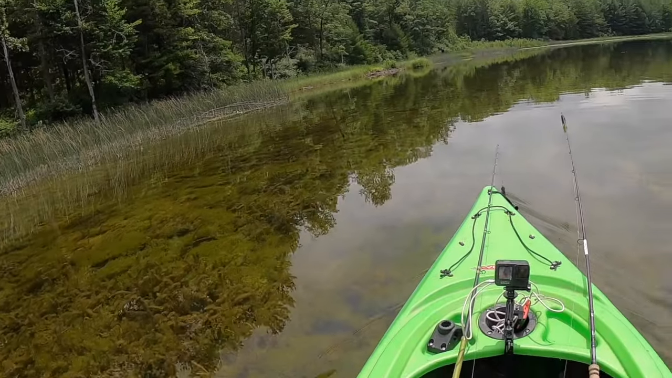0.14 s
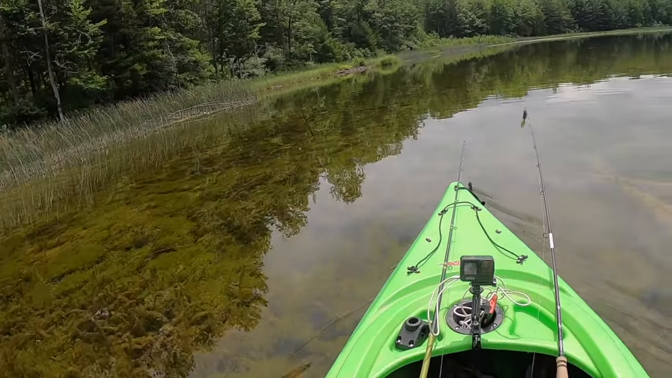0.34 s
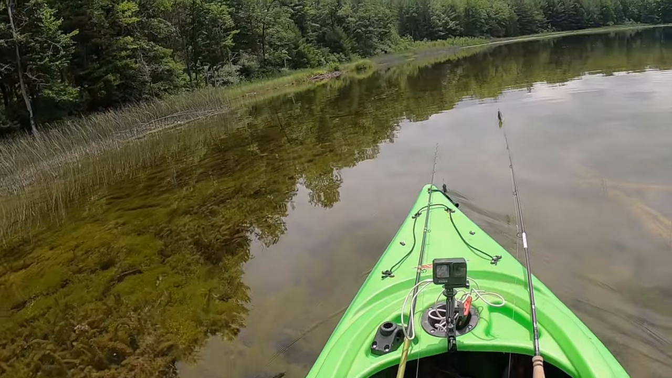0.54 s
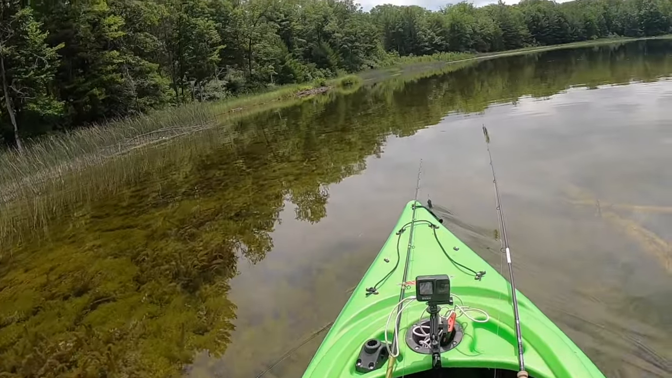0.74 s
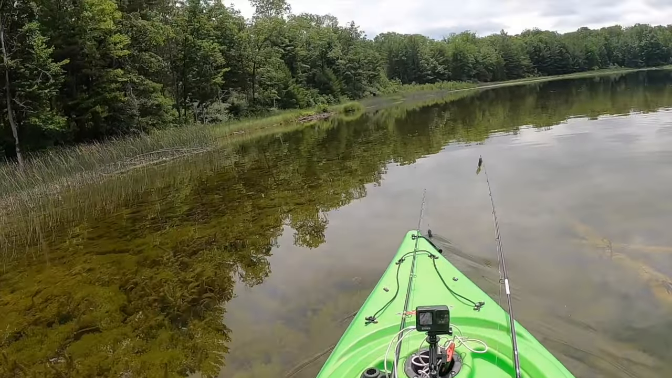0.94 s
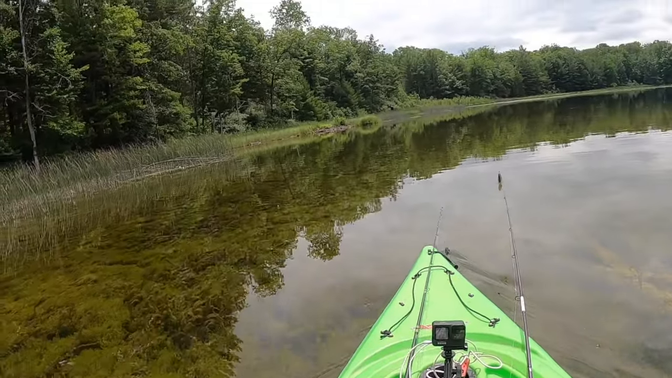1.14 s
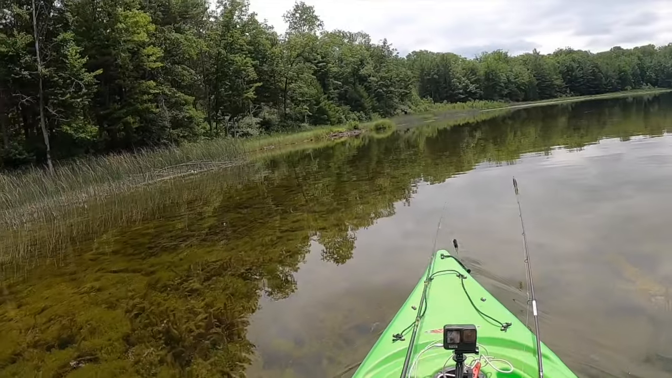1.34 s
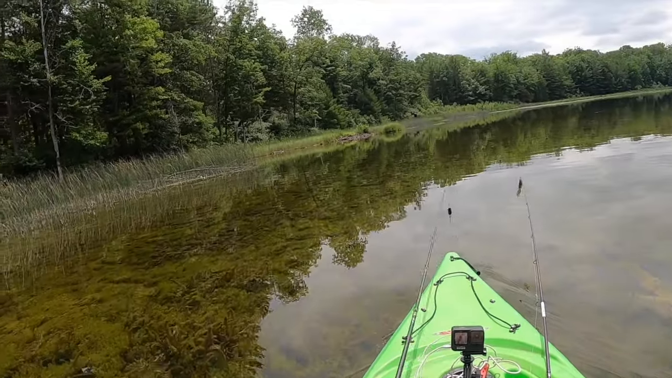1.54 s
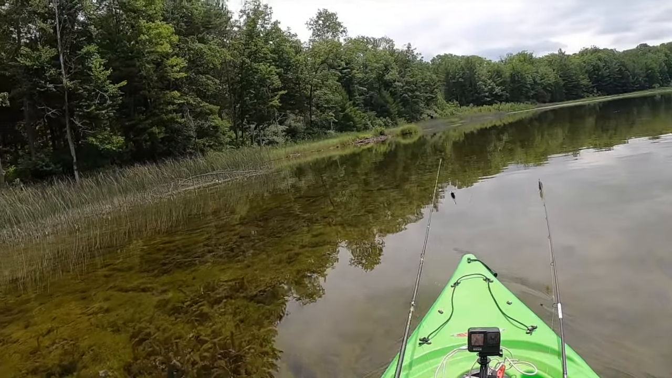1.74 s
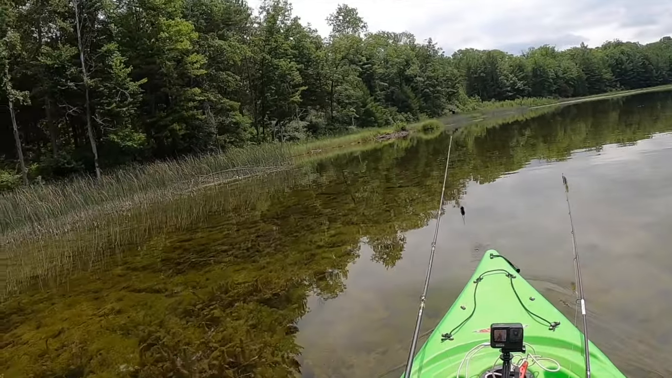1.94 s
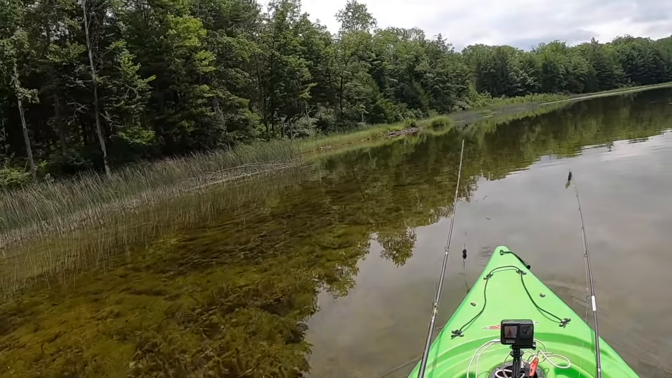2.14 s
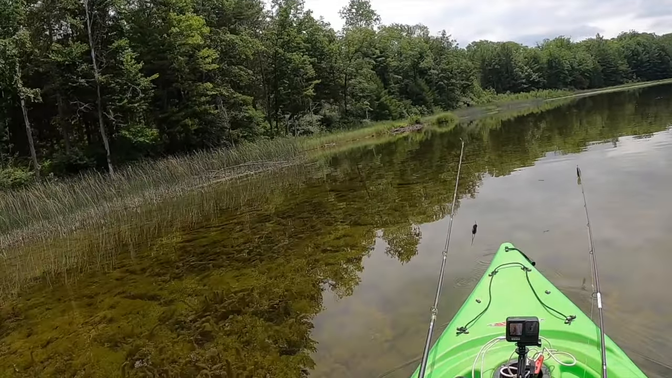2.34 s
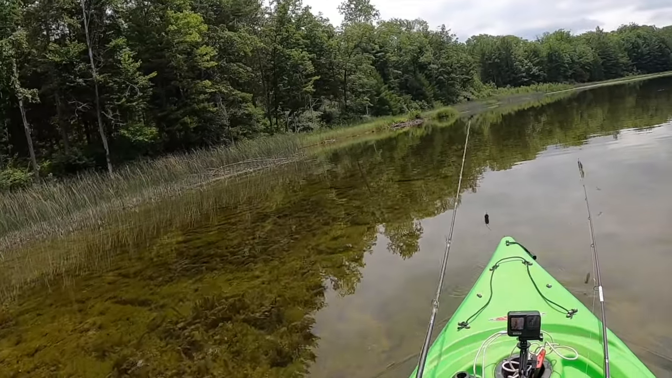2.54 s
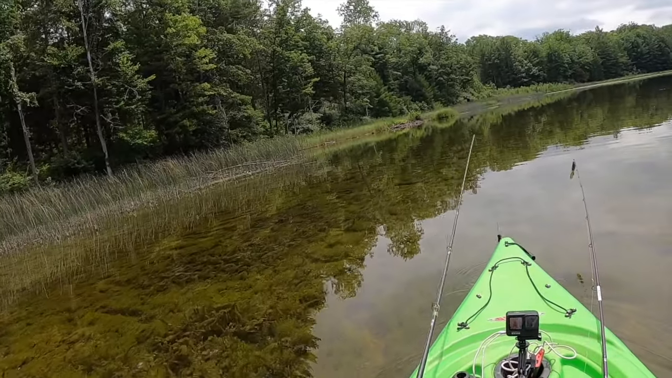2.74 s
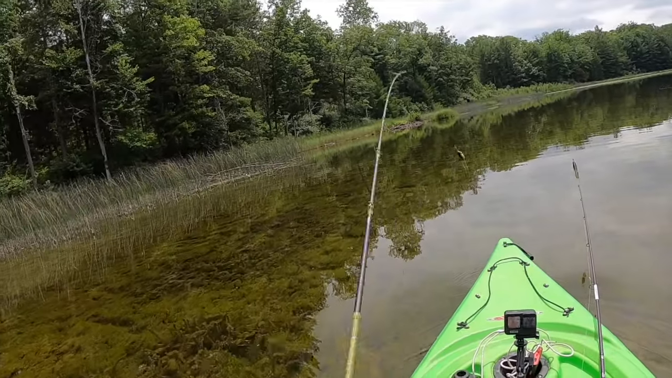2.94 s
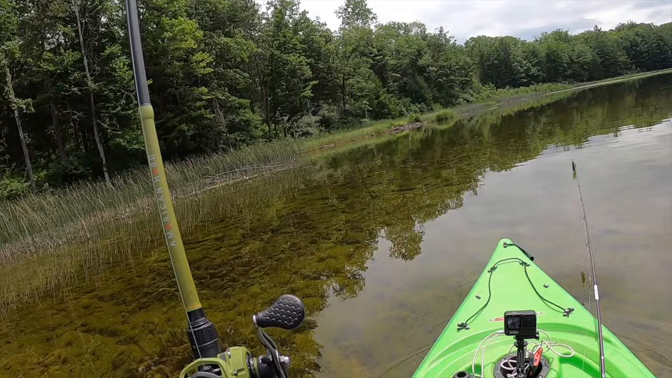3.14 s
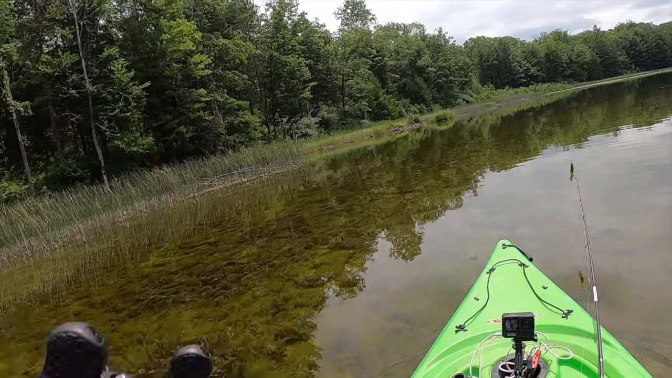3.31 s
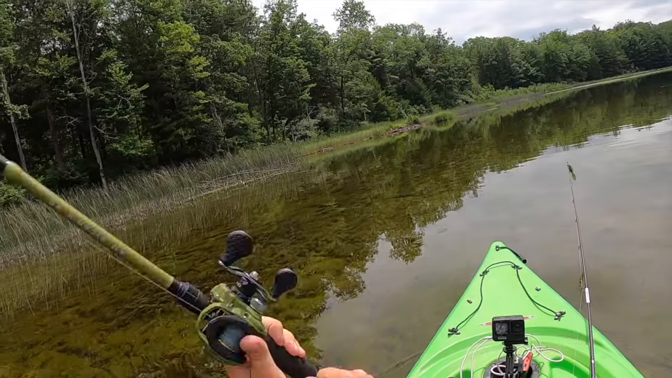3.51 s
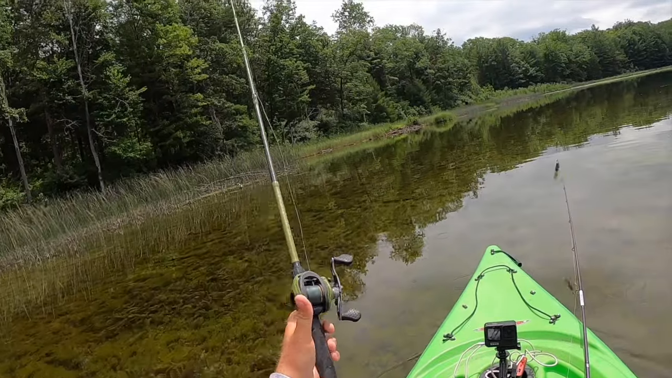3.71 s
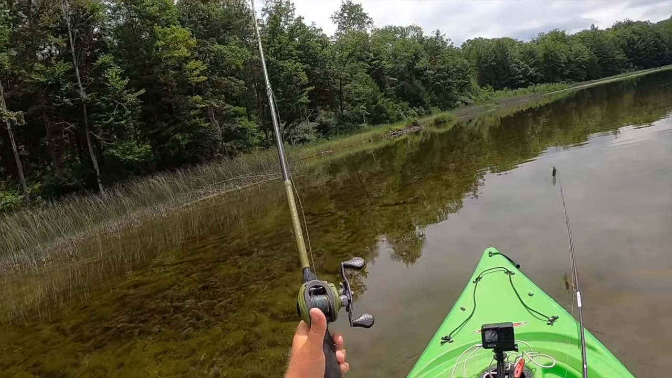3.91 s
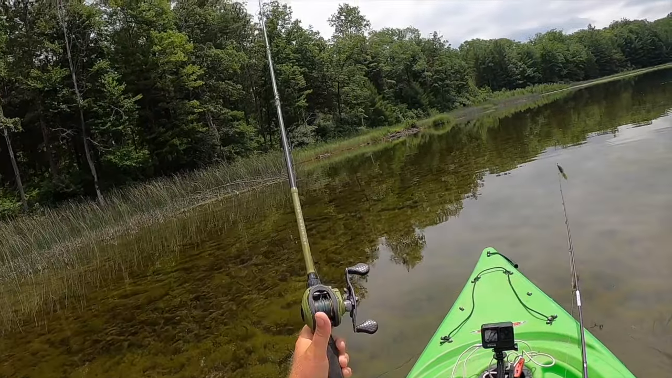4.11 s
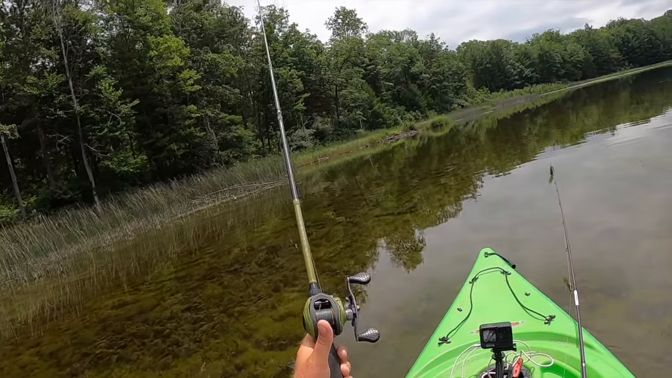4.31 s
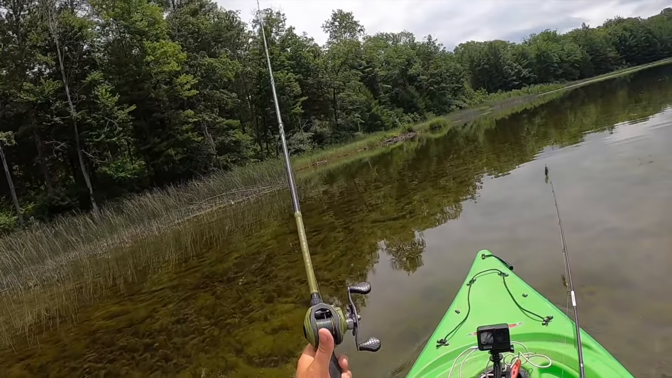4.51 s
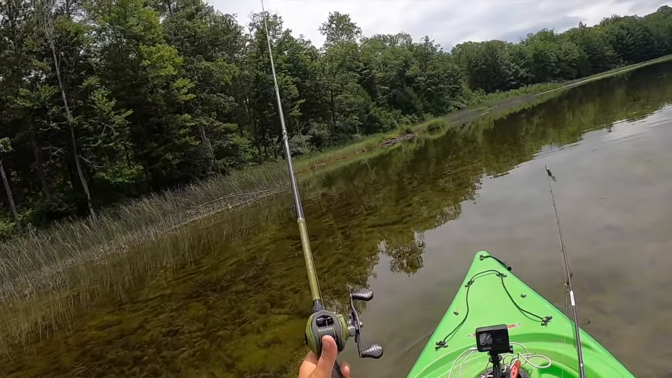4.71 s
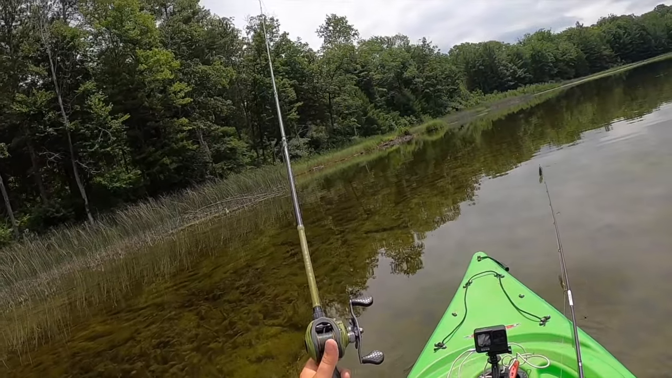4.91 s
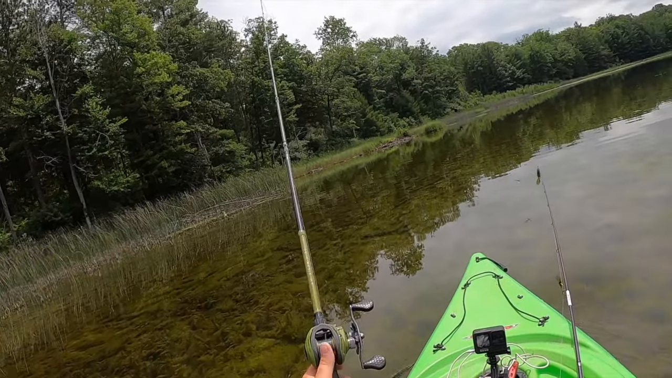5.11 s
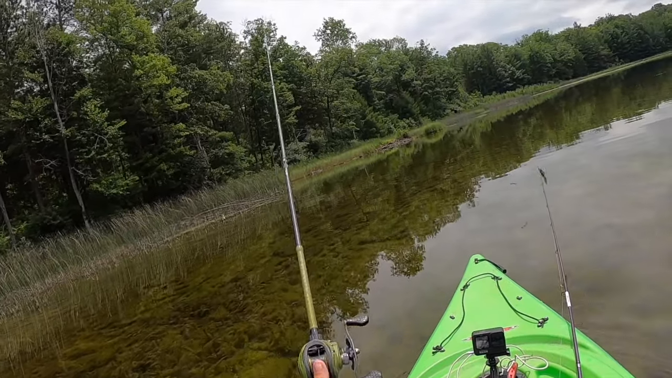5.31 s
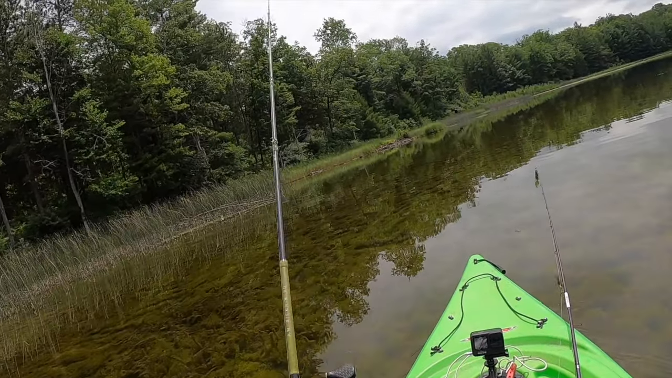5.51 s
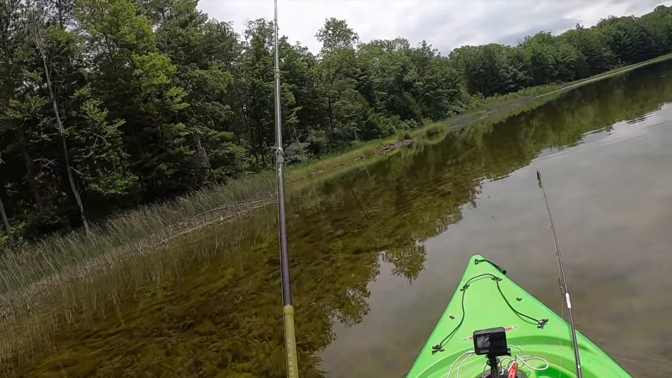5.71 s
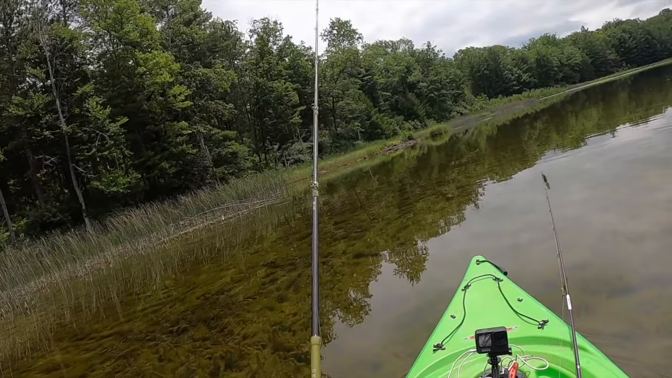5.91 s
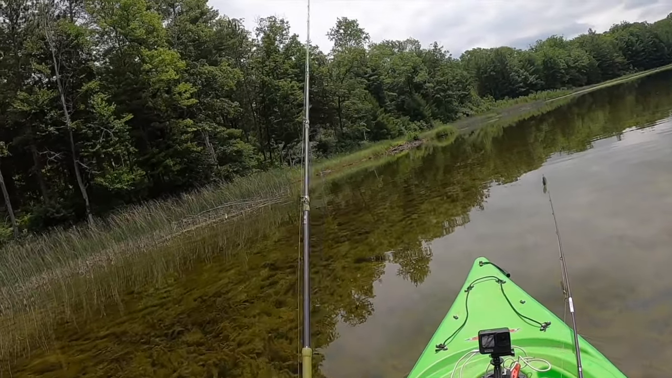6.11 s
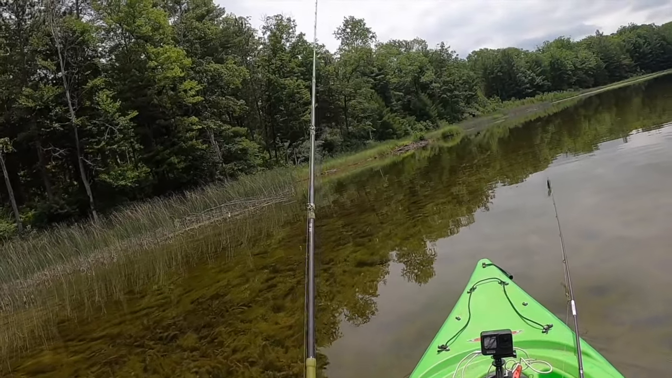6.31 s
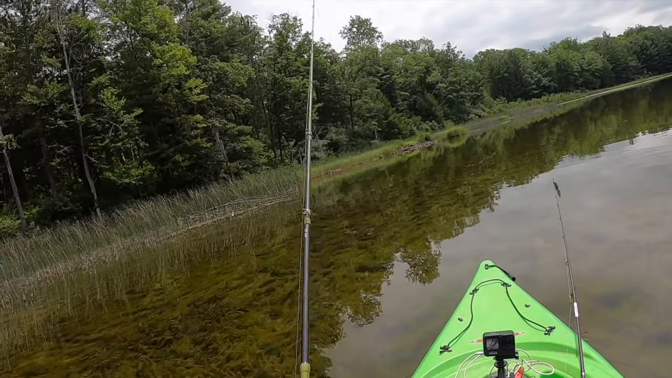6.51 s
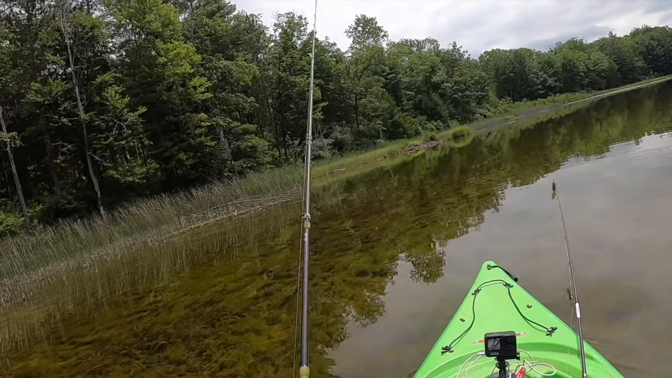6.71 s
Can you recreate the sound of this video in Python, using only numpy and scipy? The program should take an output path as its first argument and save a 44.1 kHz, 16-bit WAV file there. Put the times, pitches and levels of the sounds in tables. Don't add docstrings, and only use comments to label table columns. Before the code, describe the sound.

An angler handles gear in a plastic kayak: shuffling and dull thuds, sparse bright clicks, one very sharp snap. After a short lull, knocks bunch together and the cast zips out, the reel whirring and humming lower as line ticks through the guides. It stops, a reel click cluster follows, and soft rubbing continues. Distant birds chirp, a fly passes, and a low faint rumble lies beneath the close outdoor stereo sound.

```python
import sys
import numpy as np
from scipy import signal
from scipy.io import wavfile
from scipy.ndimage import uniform_filter1d

SR = 44100
rng = np.random.default_rng(int(sys.argv[2]) if len(sys.argv) > 2 else 0)


def unload_audio(sound):
    columns = np.transpose(np.atleast_2d(sound))
    steps = np.round(np.clip(columns, -1, 1) * 32767)
    wavfile.write(sys.argv[1], SR, steps.astype(np.int16))


def invert_db(level):
    return 10 ** (np.asarray(level, dtype=float) / 20)


N = 297675

# time_s, hull_sway_db
RUMBLE_S_DB = [(0.0, -59), (0.28, -61), (2.3, -63), (2.5, -69), (3.27, -69), (3.6, -64), (3.76, -54),
               (3.93, -70), (4.57, -74), (5.77, -61), (5.92, -74), (6.75, -69)]
# freq_hz, level_db
DEEP_HZ_DB = [(15, -18), (30, -11), (45, -4.5), (60, -17.5), (77, 3), (95, -9), (115, -11), (140, -54)]
UPPER_HZ_DB = [(90, -13), (120, -6.5), (152, 4), (200, -2), (300, -9.5), (420, -18), (600, -45)]
AIR_HZ_DB = [(165, -4), (500, -16), (1250, -11), (1900, -18), (2750, -8), (4030, -24.5), (7500, -22),
             (9000, -34)]
FIZZ_HZ_DB = [(8800, -6), (9500, 0), (10800, -7), (12500, -2), (13600, -8), (14500, -30)]
AIR_DB, FIZZ_DB = -70, -98.5
UPPER_DB, UPPER_FOLLOWS = -63.5, .35
# freq_hz, correlation_ratio
SAME_HZ_RATIO = [(60, .92), (180, 0.59), (550, 0.49), (1650, 0.7), (4970, 0.29), (15000, 0.5)]
# freq_hz, left_minus_right_db
LEAN_HZ_DB = [(60, 2), (180, -1.5), (550, -3.5), (1650, 2.5), (4970, 3.5), (15000, -7.5)]

# freq_hz, level_db
RUB_HZ_DB = [(150, -27), (300, -4), (600, -1), (850, -6), (1150, 6.5), (1500, -1.5), (2000, -24.5),
             (3000, -44)]
REEL_HZ_DB = [(1200, -28), (1800, -4), (2200, 1.5), (2800, 2.5), (3500, -4), (4300, -9.5), (6000, -20)]
CLOTH_HZ_DB = [(2500, -3), (3800, -5.5), (5000, -0.5), (6000, -1), (7400, -4.5), (7900, -4), (8600, -17)]
HISS_HZ_DB = [(7000, -30), (8300, 1.5), (9000, 1.5), (10000, -5), (12000, -10), (14000, -18), (15600, -30)]
STIRS_DB = {"hull": (0, -14, -28, -42), "reel": (-12, 0, -19, -40), "whir": (-30, -16, -9, 0),
            "sleeve": (-8, -4, 0, -10.5), "rod": (-3, 1, 2, -9), "line": (-11, -2.5, -6, -11),
            "rest": (-82, -82, -90, -95)}
MOVES = {"hull": [(.02, -54, .1, .13), (.48, -53, .35, .3), (.5, -54, .2, .04), (.668, -52, .02, .13),
         (1.1, -67, .5, 3.0), (2.3, -58, .03, .12), (3.22, -62, .08, .25), (3.62, -59, .6, .3),
         (3.82, -54, .1, .45), (5.7, -59, .4, .4), (6.3, -69, 1.1, 2.2)], "reel": [(.022, -49, .1, .07),
         (.335, -45, .06, .04), (.25, -55, .04, .03), (.72, -65, .4, 1.8), (3.6, -60, .3, .1),
         (3.775, -46, .04, .1), (1.2, -68, .15, .3), (1.66, -61, .1, .2), (2.245, -61, .12, .1),
         (2.56, -67, .08, .2), (2.65, -68, .1, .1), (3.12, -66, .3, .3), (5.4, -60.5, .4, 1.6),
         (6.4, -64, 1.5, 2.2)], "sleeve": [(1.73, -62, .03, .24), (2.32, -63, .04, .45),
         (2.985, -75, .03, .15), (3.25, -65, .1, .1), (3.3, -69, .12, 1.1), (3.645, -57, .08, .04),
         (5.5, -71, .1, .15), (5.85, -68, .1, .6), (6.15, -70, .15, .3), (6.38, -70, .15, 1.5)],
         "rod": [(3.728, -41.5, .07, .15), (3.785, -45, .06, .07)], "whir": [(3.785, -52, .09, .06),
         (3.9, -58, .1, 1.25), (4.42, -66, .05, .1), (4.51, -67, .06, .15), (4.72, -69, .08, .12),
         (4.84, -67, .06, .08), (5.02, -74, .15, .4), (5.31, -63, .04, .05)]}
LINE_OUT_S, THUMB_S, LINE_DB, LINE_FADE_DB_PER_S = 3.8, 5.335, -55, 8.5

# start_s, peak_db, ring_hz, bright_db
TICKS = [(0.012, -42, 3000, -34), (0.2129, -52, 2200, -30), (0.2229, -48, 2900, -26),
         (0.244, -50, 2600, -30), (0.2515, -42, 2460, -32), (0.258, -47, 2700, -32),
         (0.2848, -47, 2900, -32), (0.3027, -46, 2200, -34), (0.3162, -45, 2100, -35),
         (0.3301, -38, 2030, -38), (0.5766, -47, 2400, -26), (2.9333, -46, 2200, -40),
         (3.526, -48, 2400, -30), (3.175, -52, 1750, -35), (3.204, -52, 1700, -35), (2.916, -54, 1700, -35),
         (3.765, -34, 2800, -20), (3.771, -34, 2400, -20), (3.867, -40, 2700, -15),
         (1.3648, -53, 2980, -15), (1.713, -27, 6300, -18), (1.7128, -36, 1600, -30),
         (2.0448, -49.5, 2520, -12.5), (2.1753, -49.5, 2550, -9.5), (2.2144, -47, 2436, -4),
         (2.3364, -36, 2350, -26), (2.3998, -46.5, 2130, -17), (2.4367, -48.5, 3800, -29),
         (5.6194, -38, 1900, -34), (5.622, -42, 2800, -34), (5.7175, -33.5, 2140, -35),
         (6.3228, -37.5, 2840, -24), (6.354, -49, 3420, -14)]
# start_s, peak_db, ring_hz
KNOCKS = [(0.026, -41, 1440), (0.06, -48, 700), (0.12, -53, 800), (0.198, -51, 192), (3.718, -31, 780),
          (0.672, -44, 900), (0.704, -44, 1200), (0.486, -48, 1230), (0.512, -46, 1080), (0.69, -46, 300),
          (3.474, -44, 1500), (3.481, -43, 130), (3.556, -47, 1900), (3.637, -38, 400), (3.612, -44, 487),
          (3.698, -42, 900), (3.713, -32, 600), (3.738, -36, 1200), (3.68, -44, 280), (0.529, -38, 630),
          (0.547, -43, 600), (0.537, -40, 610), (0.663, -44, 1080), (0.684, -37.5, 1320),
          (2.322, -52, 1160), (2.825, -54, 1100), (3.475, -40, 350), (3.513, -50, 217), (3.549, -42, 1314),
          (3.632, -33, 454), (3.721, -26, 540), (3.726, -34, 1050), (3.809, -45, 272), (4.686, -48, 1550),
          (4.703, -46, 1345), (5.448, -50.5, 1170), (5.542, -42, 1020), (5.572, -40, 323),
          (5.592, -45, 217), (5.882, -44, 300)]
# start_s, peak_db, ring_hz
SLAPS = [(3.8531, -42, 3560), (3.859, -44, 5000), (3.925, -45, 5200), (3.9394, -43, 3700),
         (4.417, -47, 8800), (4.1163, -42, 5500), (4.1575, -43, 3760), (4.2376, -44, 3630),
         (4.3052, -46, 5340), (4.363, -41, 6250), (5.3082, -50, 3560), (5.328, -54, 2200)]

# level_db, path [time_s, pitch_hz], beat_hz, depth_hz
TRILLS = [
    (-70.5, [(.497, 8000), (.575, 7850)], 40, 700),
    (-70, [(.58, 7750), (.76, 7500)], 29, 800),
    (-73.5, [(.82, 7300), (.97, 7570)], 37, 390),
    (-75.5, [(1.37, 7480), (1.63, 7460)], 31, 2000),
]
# start_s, length_s, level_db, from_hz, to_hz
SLURS = [(.785, .13, -68.5, 3200, 2130), (1.79, .06, -71, 2250, 2500), (2.75, .05, -70, 1950, 2480),
         (3.074, .095, -67, 3950, 2150), (5.42, .075, -63, 3950, 3450), (5.69, .09, -61.5, 2100, 2600),
         (5.92, .14, -68.5, 3600, 3400), (5.97, .21, -69.5, 3050, 2700), (6.19, .14, -62.5, 3400, 2130),
         (1.24, .065, -68, 2600, 3000), (1.95, .03, -68, 2600, 3450), (2.06, .035, -68, 2600, 2900),
         (6.665, .08, -75, 7000, 7600)]
# start_s, length_s, level_db, from_hz, to_hz
GLIDES = [(.74, .035, -67, 2800, 3300), (1.385, .025, -67, 2900, 3040), (1.45, .075, -61.5, 2630, 2700),
          (1.595, .075, -61.5, 2500, 2450), (1.46, .17, -67, 2950, 2900), (.95, .07, -70, 2200, 2130),
          (1.018, .03, -67, 2980, 2800), (1.03, .06, -71, 2500, 2430), (5.2, .08, -71, 3420, 3400),
          (5.505, .095, -68, 3430, 3480), (5.535, .025, -67, 2900, 3200), (5.55, .035, -66, 2800, 2300),
          (5.825, .04, -65, 2300, 2620), (5.94, .06, -72, 3850, 3780), (5.945, .035, -70, 2850, 3100),
          (6.03, .035, -68, 3200, 2800), (6.165, .03, -69, 2980, 2900), (5.4, .02, -69, 3150, 3400),
          (5.44, .025, -67, 2550, 2300), (5.44, .025, -69, 4000, 4250), (1.5, .17, -68.5, 2320, 2350),
          (1.89, .035, -75, 3500, 2550), (1.99, .04, -73, 2950, 2400), (2.19, .06, -72.5, 2650, 2300),
          (2.865, .045, -70, 2850, 2400), (2.91, .04, -68, 2400, 3300), (3.02, .036, -66, 3700, 2500),
          (3.056, .018, -67, 2500, 3950), (4.7, .25, -75, 4330, 4220), (5.0, .15, -74, 5050, 4950),
          (5.04, .06, -70, 3150, 2770), (5.15, .05, -67, 2800, 2850), (5.315, .032, -64, 3800, 2900),
          (5.32, .1, -67.5, 3900, 3880), (5.405, .045, -61.5, 2750, 3300), (5.474, .028, -61.5, 3450, 2600),
          (5.83, .11, -70, 3900, 3850), (6.4, .045, -63, 2350, 2700), (6.44, .035, -61.5, 2790, 2800)]
# start_s, length_s, level_db, from_hz, to_hz
DROOPS = [
    (1.295, .055, -69, 3000, 2720),
    (1.405, .05, -62, 3040, 2630),
    (2.09, .06, -68, 2900, 2280),
    (1.55, .05, -62, 2830, 2500),
]
# start_s, length_s, level_db
SEEPS = [
    (1.2, .36, -85.5),
    (2.74, .41, -79.5),
    (5.53, .43, -77),
]
SETTLE_RATIO = .2
SEEP_HZ, SEEP_ARCH_HZ = 6870, 570

# start_s, blow_db, tilt_db_per_octave
SNAPS = [
    [(1.6795, -10, 3), (1.6818, -17, -1), (1.6865, -41, -8)],
    [(2.2575, -35, -4), (2.2665, -19, -3), (2.2688, -3.3, 2.4), (2.2715, -22, 0), (2.2742, -23, -1),
     (2.2772, -29, -5)],
    [(2.9495, -42, 2), (2.9512, -38, 6), (2.9585, -28, 8), (2.9595, -14.5, -0.5), (2.9608, -22, 1),
     (2.9652, -32, -12)],
    [(5.7858, -28.5, -3), (5.7875, -28, -2), (5.7888, -21, 1), (5.7906, -16, -3.5), (5.7928, -13.5, 1.5),
     (5.8085, -40, -8.5)],
]
# freq_hz, level_db
RINGS_HZ_DB = [
    [(1350, -8), (2000, -28), (2870, -4), (3260, -4.5), (3900, -10), (5130, -12), (5450, -16), (8880, -13)],
    [(1320, -9), (2150, -5), (2670, 3), (4070, -8), (4860, -2), (5550, 2), (6200, -4), (7100, -1),
     (8700, -1), (11000, -12), (13500, -16)],
    [(1270, -9), (2300, -4), (2880, 0), (3400, -6), (4680, -5), (6100, -8), (7300, -3), (9050, -10.5),
     (11400, -17)],
    [(1600, -18), (1030, -11), (2150, 3.5), (2600, 1), (3000, -2), (3900, -6), (4600, -3), (5200, 2),
     (6500, -6), (8500, -6), (7110, -2), (9510, 3), (12360, -13)],
]
# freq_hz, level_db
HULL_HZ_DB = [(590, -17), (790, -16), (1010, -16)]
DETUNE_RATIO, UNEVEN_DB = .03, 1.6
CRACK_DB, CRACK_S = -11, .0004

# start_s, length_s, level_db, from_hz, to_hz
ZIPS = [
    (3.715, .031, -41.5, 1500, 8400),
    (3.738, .042, -45, 3000, 12600),
]
# time_s, turns_hz, whine_db
SPIN_UP = [(3.715, 15, -60), (3.73, 58, -48), (3.742, 100, -54), (3.757, 190, -52)]
SPOOL = SPIN_UP + [(3.768, 245, -49), (3.85, 250, -74), (4.2, 228, -65), (4.44, 203, -67),
         (4.6, 166, -69.5), (4.85, 137, -69), (5.1, 115, -67.5), (5.34, 105, -74)]
# freq_hz, level_db
FRAME_HZ_DB = [(200, 0.5), (800, -10), (1050, 0.5), (1500, 5), (2100, 7), (2450, -6), (2900, -8),
               (3600, -27)]
WHINE_ORDER, WHINE_TOP_HZ = 38.5, 9050
HUM_DB, HUM_FADE_DB_PER_S, PLATE_FADE_DB_PER_S = -49.5, 20, 11
HALF_DB = -5

# time_s, wing_beat_hz, level_db
FLY = [(4.0, 146.3, -73), (4.29, 148.6, -65), (4.72, 147, -67.5)]
# multiple, level_db
WING_MULTIPLE_DB = [(1, 0), (2, -3), (3, -15), (4, -13), (5, -12), (6, -17)]


def evened(x):
    return x / np.sqrt(np.mean(x ** 2) + 1e-20)


def read(points, hz):
    f, value = np.transpose(points)
    return np.interp(np.log(hz + 1), np.log(f + 1), value)


def columns(rows):
    s, *values = np.transpose(rows)
    return [np.interp(np.arange(N) / SR, s, v) for v in values]


def add(mix, start_s, sound):
    part = mix[round(start_s * SR):][:len(sound)]
    part += sound[:len(part)]


def wander(size):
    return evened(uniform_filter1d(uniform_filter1d(rng.standard_normal(N), size), size))


def resonate(x, hz, width_hz):
    turn = np.exp(2j * np.pi * np.cumsum(hz) / SR)
    r = np.exp(-np.pi * width_hz / SR)
    return (turn * signal.lfilter([1 - r], [1, -r], x / turn)).real


def resonate_twice(x, hz, width_hz):
    return evened(resonate(resonate(x, hz, width_hz), hz, width_hz))


def noise(layers, size):
    frames, hz = 4 * N // size + 5, np.fft.rfftfreq(size, 1 / SR)
    at = np.minimum(np.arange(frames) * size // 4, N - 1)
    power = 0
    for shape, level_db, patchy_db, flicker_db in layers:
        patches = rng.standard_normal((frames, len(hz))).T
        patches = evened(uniform_filter1d(uniform_filter1d(patches, size=6, axis=0), size=10, axis=1))
        flicker = np.minimum(uniform_filter1d(rng.exponential(1, frames), size=3), 3)
        outside = (hz < shape[0][0]) | (hz > shape[-1][0])
        colour_db = read(shape, hz) - 60 * outside
        field = evened(invert_db(colour_db[:, None] + patchy_db * patches + flicker_db * flicker))
        power = power + (field * invert_db(level_db * np.ones(N))[at]) ** 2
    a, b, c, d = rng.standard_normal((frames, len(hz), 4)).T
    same = np.clip(read(SAME_HZ_RATIO, hz), -1, 1)[:, None]
    lean = invert_db(read(LEAN_HZ_DB, hz) / 2)[:, None]
    left = a + 1j * b
    right = same * left + np.sqrt(1 - same ** 2) * (c + 1j * d)
    z = np.array([left * lean, right / lean])
    z *= np.sqrt(3 * power / size)
    return signal.istft(z, nperseg=size, noverlap=3 * size // 4)[1][:, :N]


def space(x, t60_s, gap_s, top_hz):
    t = np.arange(round(t60_s * SR)) / SR
    echoes = rng.standard_normal((2, SR))[:, :len(t)] * (rng.random((2, SR))[:, :len(t)] < .1)
    echoes = echoes * invert_db(-60 * t / t60_s) * (t > gap_s)
    echoes = signal.lfilter(*signal.butter(4, top_hz, fs=SR), echoes)
    return signal.fftconvolve(x[None], echoes / np.linalg.norm(echoes[0]), axes=1)[:, :N]


def ring(hz, width_hz, phase_turns, rise_s=0.0003):
    t = np.arange(1500) / SR
    tone = np.sin(2 * np.pi * (hz * t + phase_turns))
    return tone * np.exp(-np.pi * width_hz * t) * np.minimum(t / rise_s, 1)


def lake():
    sway_db, = columns(RUMBLE_S_DB)
    upper_db = UPPER_DB + UPPER_FOLLOWS * (sway_db - UPPER_DB)
    rumble = noise([(DEEP_HZ_DB, sway_db, 1.5, 4.5), (UPPER_HZ_DB, upper_db, 1.2, 1.5)], size=4096)
    return rumble + noise([(AIR_HZ_DB, AIR_DB, 1.2, .4), (FIZZ_HZ_DB, FIZZ_DB, 1.1, .3)], size=1024)


def stirred():
    t = np.arange(0, N, 64) / SR
    runs = (t > LINE_OUT_S) & (t < THUMB_S)
    line = runs * invert_db(LINE_DB - LINE_FADE_DB_PER_S * (t - LINE_OUT_S)) ** 2
    effort = {"rest": np.ones(len(t)), "line": line}
    for kind, rows in MOVES.items():
        effort[kind] = sum(invert_db(db - 20 * np.maximum((s - t) / swell_s, (t - s) / die_s)) ** 2
                           for s, db, swell_s, die_s in rows)
    power = sum(np.outer(invert_db(np.array(STIRS_DB[kind])) ** 2, effort[kind]) for kind in STIRS_DB)
    return np.repeat(10 * np.log10(power), 64, axis=1)[:, :N]


def hands():
    rub_db, reel_db, cloth_db, hiss_db = stirred()
    return noise([(RUB_HZ_DB, rub_db, 1.2, 1.6), (REEL_HZ_DB, reel_db, 2.2, 2.6),
                  (CLOTH_HZ_DB, cloth_db, 2.2, 2.8), (HISS_HZ_DB, hiss_db, 1.6, 2.3)], size=256)


def taps(rows, damping, spread, crack_s, crack_hz):
    out, t = np.zeros(N), np.arange(1500) / SR
    band = signal.butter(3, crack_hz, "band", fs=SR, output="sos")
    for s, db, hz, bright_db in rows:
        body = ring(hz, damping * hz, 0, 0.00017)
        body += 0.32 * ring(spread * hz, damping * hz, rng.random(), 0.0015)
        crack = signal.sosfilt(band, rng.standard_normal(1500) * t * np.exp(-t / crack_s))
        crack = invert_db(bright_db + 8.5) * crack / abs(crack).max()
        add(out, s, invert_db(db) * (body / abs(body).max() + crack))
    return out


def along(length_s):
    return np.arange(0, length_s, 1 / SR) / length_s


def songs():
    notes = []
    for s, length_s, db, hz, to_hz in SLURS:
        notes.append((s, db, to_hz + (hz - to_hz) * np.exp(-along(length_s) / SETTLE_RATIO), 0))
    for s, length_s, db, hz, to_hz in GLIDES:
        notes.append((s, db, hz + (to_hz - hz) * along(length_s), 0))
    for s, length_s, db, hz, to_hz in DROOPS:
        notes.append((s, db, hz + (to_hz - hz) * along(length_s) ** 2, 0))
    for s, length_s, db in SEEPS:
        notes.append((s, db, SEEP_HZ + SEEP_ARCH_HZ * np.sin(np.pi * along(length_s)) ** .6, 0))
    for db, path, beat_hz, depth_hz in TRILLS:
        s, hz = np.transpose(path)
        t = np.arange(s[0], s[-1], 1 / SR)
        dip = np.cos(np.pi * beat_hz * (t - s[0])) ** 2
        notes.append((s[0], db, np.interp(t, s, hz) - depth_hz * dip, dip))
    return notes


def birds():
    out, quaver = np.zeros(N), wander(size=250)
    for s, db, hz, dip in songs():
        hz = hz + 26 * quaver[round(s * SR):][:len(hz)]
        tone = np.sin(2 * np.pi * np.cumsum(hz) / SR) * (1 - dip)
        fade = signal.windows.tukey(len(hz), min(900 / len(hz), .4))
        add(out, s, invert_db(db + 4.5) * tone * fade)
    out *= invert_db(3.0 * wander(size=260))
    return out * invert_db(np.array([[1.5], [-1.5]])) + invert_db(-4.5) * space(out, 0.6, 0.015, 8500)


def snaps():
    out, t = np.zeros(N), np.arange(1500) / SR
    dull = signal.butter(2, 13500, fs=SR, output="sos")
    for strikes, reel_modes in zip(SNAPS, RINGS_HZ_DB):
        modes = HULL_HZ_DB + reel_modes
        for s, blow_db, tilt_db in strikes:
            body = np.zeros(1500)
            for k, (hz, db) in enumerate(modes):
                phase, detune, uneven = rng.random(3)
                mode_db = db + tilt_db * np.log2(hz / 3000) + UNEVEN_DB * (2 * uneven - 1)
                mode_hz = hz * (1 + DETUNE_RATIO * (2 * detune - 1))
                turns = k % 2 / 2 + .12 * phase
                body += invert_db(mode_db) * ring(mode_hz, 190 + 0.07 * hz, turns, 0.0005)
            crack = rng.standard_normal(1500) * t / CRACK_S * np.exp(-t / CRACK_S)
            crack = invert_db(CRACK_DB + min(tilt_db, 0)) * signal.sosfilt(dull, crack)
            add(out, s - .0003, invert_db(blow_db) * (body / abs(body).max() + crack))
    return signal.sosfilt(signal.butter(2, 500, "high", fs=SR, output="sos"), out)


def zips():
    out = np.zeros(N)
    for s, length_s, db, hz, to_hz in ZIPS:
        path_hz = np.linspace(hz, to_hz, round(length_s * SR))
        grit = rng.standard_normal(3000)[:len(path_hz)]
        add(out, s, invert_db(db) * np.hanning(len(path_hz)) ** .5 * resonate_twice(grit, path_hz, 500))
    return out


def spool():
    span = slice(round(SPOOL[0][0] * SR), round(SPOOL[-1][0] * SR))
    turns_hz, whine_db = (c[span] for c in columns(SPOOL))
    t = np.arange(len(turns_hz)) / SR
    whine_hz = np.minimum(WHINE_ORDER * turns_hz, WHINE_TOP_HZ)
    grit = (rng.standard_normal(N) * invert_db(3.0 * wander(size=400)))[span]
    whine = resonate_twice(grit, whine_hz, 250)
    whine += invert_db(-7) * resonate_twice(grit, 1.07 * whine_hz, 180)
    whine += invert_db(-7.5) * resonate_twice(grit, 0.92 * whine_hz, 200)
    octave = resonate_twice(grit, 2 * whine_hz, 450) * np.clip((12800 - 2 * whine_hz) / 900, 0, 1)
    whine += invert_db(-14 + 4.0 * wander(size=3000)[span]) * octave

    angle = 2 * np.pi * np.cumsum(turns_hz * (1 + 0.008 * wander(size=400)[span])) / SR
    wobble_db = 4.5 * wander(size=800)
    hum = np.zeros(len(t))
    for k in np.arange(2, 30) / 2:
        order_db = read(FRAME_HZ_DB, k * turns_hz) + HALF_DB * (k % 1 > 0)
        order_db = order_db + np.roll(wobble_db, round(9000 * k))[span]
        hum += invert_db(order_db) * np.sin(k * angle + k * k)

    plate = resonate_twice(rng.standard_normal(N)[span], 2130 * np.ones(len(t)), 380)
    out = np.zeros(N)
    out[span] = invert_db(whine_db) * whine + invert_db(HUM_DB - HUM_FADE_DB_PER_S * t - 15) * hum
    out[span] += invert_db(HUM_DB - 7 - PLATE_FADE_DB_PER_S * t) * plate
    return out


def fly():
    hz, db = columns(FLY)
    angle = 2 * np.pi * np.cumsum(hz * (1 + .01 * wander(size=500))) / SR
    sway_db = 3.5 * wander(size=1800)
    start_s, end_s = FLY[0][0], FLY[-1][0]
    near = np.interp(np.arange(N) / SR, [start_s, start_s + 0.12, end_s - .15, end_s], [0, 1, 1, 0])
    stack = sum(invert_db(g_db + np.roll(sway_db, 7000 * k)) * np.sin(k * angle) for k, g_db in WING_MULTIPLE_DB)
    return np.sqrt(2) * near * invert_db(db) * stack


def scene():
    gear = snaps() + taps(TICKS, 0.14, 1.3, 0.00026, [3500, 12000]) + zips()
    gear += taps([(*slap, -14) for slap in SLAPS], 0.11, 0.47, 0.0025, [5000, 13000])
    knocks = taps([(*knock, -13) for knock in KNOCKS], 0.19, 1.876, 0.0021, [800, 2200])
    bright = signal.sosfilt(signal.butter(1, 8000, "high", fs=SR, output="sos"), gear)
    direct = gear * invert_db(np.array([[1.2], [-1.2]])) + knocks * invert_db(np.array([[-1.5], [1.5]]))
    direct += np.array([[-.6], [.4]]) * bright
    reflected = invert_db(-13) * space(gear + knocks, 0.049, .001, 3800)
    return direct + reflected + spool() + fly() + birds() + hands() + lake()


def top_cut(x):
    return signal.sosfilt(signal.butter(12, 16540, fs=SR, output="sos"), x)


def record(dry):
    lag = np.roll(dry[0], 1) - dry[0]
    lag = signal.sosfiltfilt(signal.butter(2, 9000, fs=SR, output="sos"), lag)
    late = np.array([dry[0] + lag, dry[1]])
    ported = signal.lfilter(*signal.iirnotch(8080, 17, fs=SR), late)
    ported = signal.sosfilt(signal.butter(6, 15350, fs=SR, output="sos"), ported)
    return top_cut(ported)


dry = scene()
out = record(dry)
unload_audio(out)
```